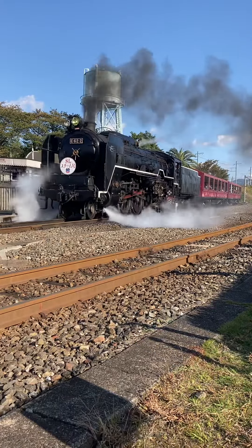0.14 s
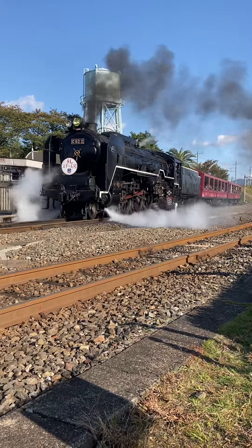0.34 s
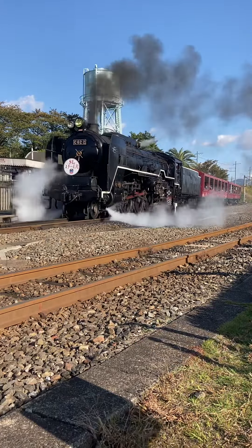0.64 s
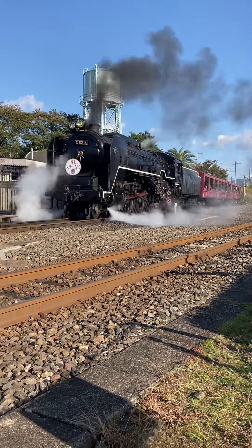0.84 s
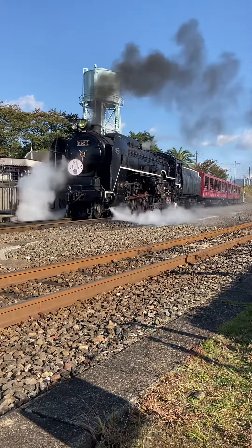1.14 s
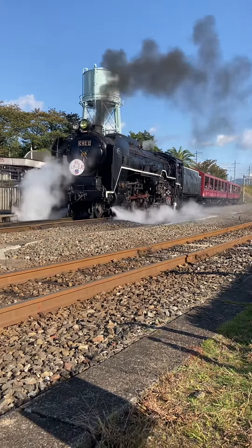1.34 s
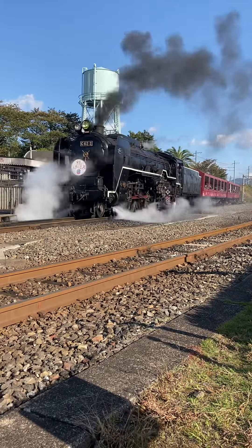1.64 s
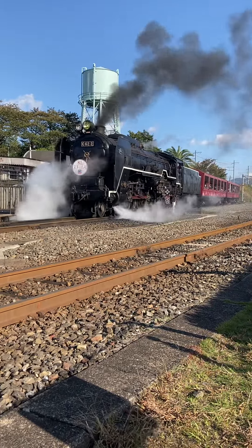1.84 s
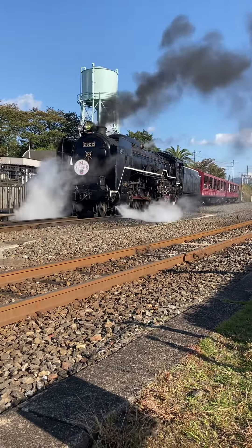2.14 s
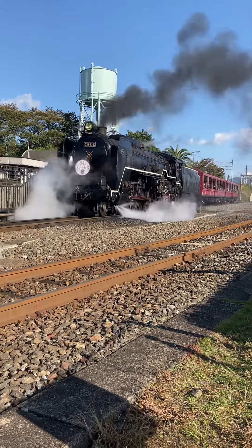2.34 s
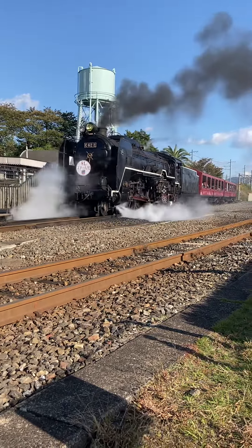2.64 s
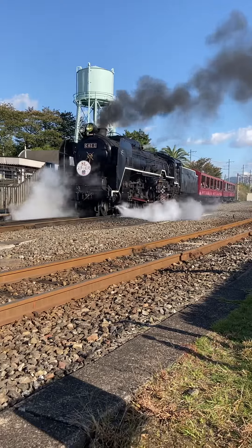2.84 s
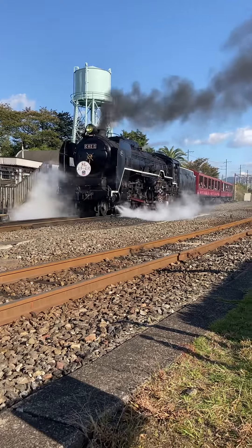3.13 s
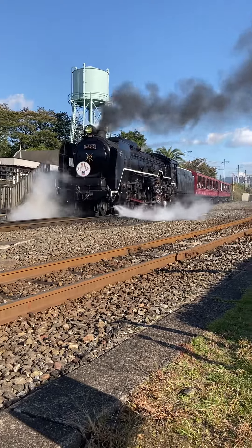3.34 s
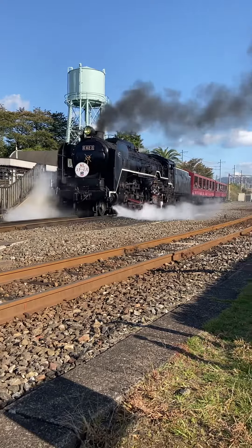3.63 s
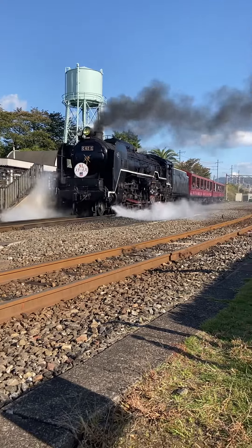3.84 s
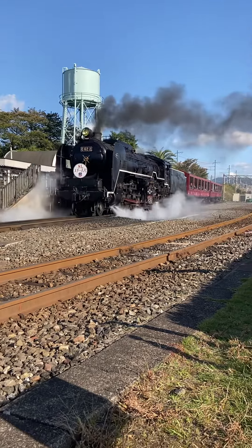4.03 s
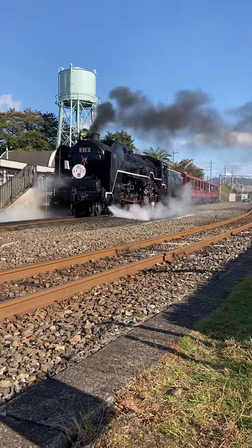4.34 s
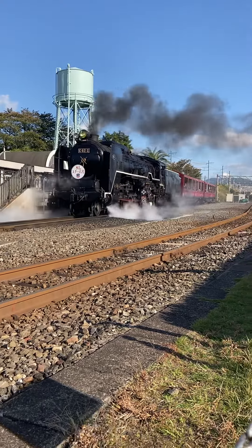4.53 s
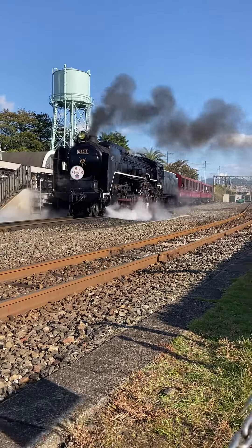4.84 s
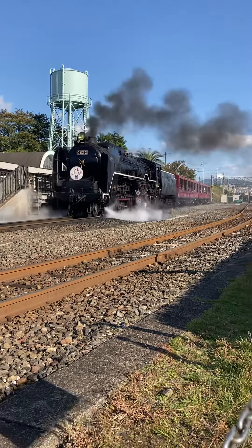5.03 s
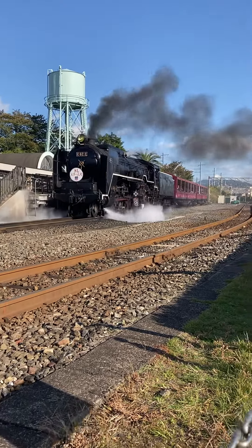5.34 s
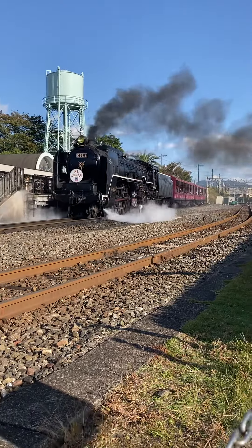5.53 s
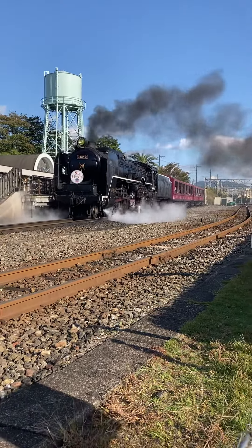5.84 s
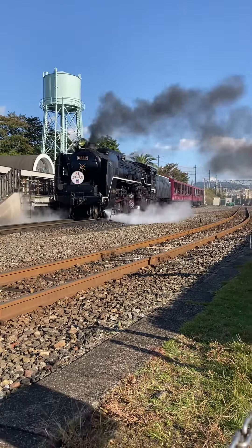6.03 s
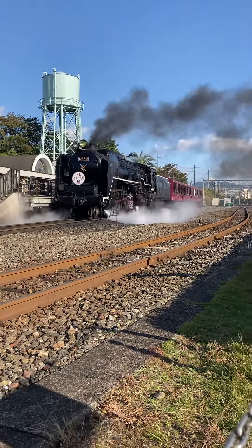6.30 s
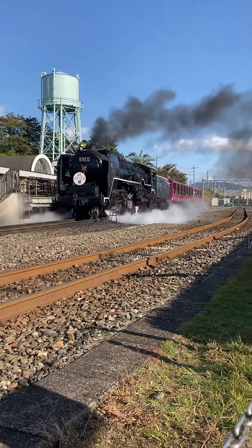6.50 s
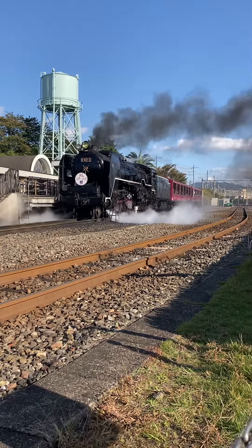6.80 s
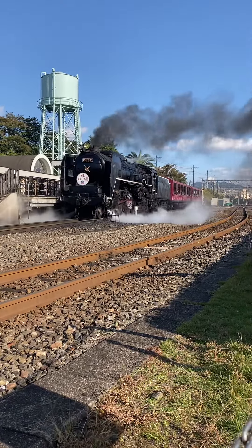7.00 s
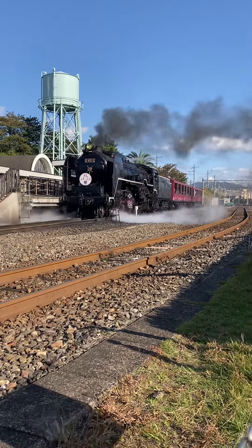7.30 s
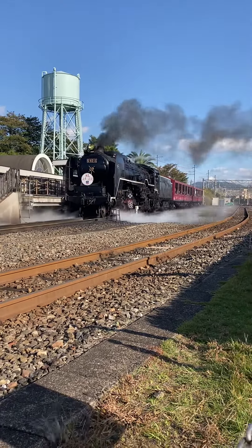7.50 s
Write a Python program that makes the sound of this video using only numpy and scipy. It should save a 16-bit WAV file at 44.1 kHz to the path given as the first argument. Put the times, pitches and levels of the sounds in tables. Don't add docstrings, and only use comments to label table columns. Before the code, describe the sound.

Surging jets of bright steam hiss over a soft furnace draught, with faint metallic squeaks and increasingly strong gusts buffeting the phone.

```python
import sys
import numpy as np
from scipy import signal
from scipy.fft import rfft, irfft, next_fast_len
from scipy.io import wavfile
from scipy.ndimage import uniform_filter1d, map_coordinates

SR = 44100
rng = np.random.default_rng(int(sys.argv[2]) if len(sys.argv) > 2 else 0)


def rack_gain(trim_db):
    fader = np.asarray(trim_db, float)
    return 10 ** (fader / 20)


def bounce(signal):
    frames = np.transpose(np.atleast_2d(signal))
    limited = np.clip(frames, -1, 1)
    pcm = np.round(limited * 32767).astype(np.int16)
    wavfile.write(sys.argv[1], SR, pcm)


N = 337786
HOP = 256
TOP_HZ = 15800


def unit(x):
    return x / np.sqrt(np.mean(x ** 2) + 1e-20)


def along(points, hz, axis=1):
    table = np.transpose(points)
    return np.interp(np.log(hz + 1), np.log(table[0] + 1), table[axis])


def curves(rows, t):
    s, *cols = np.transpose(rows)
    return np.array([np.interp(t, s, c) for c in cols])


def smooth(curve_at):
    t = np.arange(0, N + HOP, HOP) / SR
    return curves(np.vstack([t, curve_at(t)]).T, np.arange(N) / SR)


def swells(rows, t, steep=2):
    s, length = np.transpose(rows)[:2, :, None]
    return np.exp(-np.abs(2 * (t - s) / length) ** steep)


def wobble(rate):
    return map_coordinates(rng.standard_normal(N // 20), [np.arange(N) * rate / SR])


def filtered(x, response):
    m = next_fast_len(N + 8192)
    hz = np.fft.rfftfreq(m, 1 / SR)
    return irfft(rfft(x, m) * response(hz), m)[..., :N]


def shaped(x, gain_db):
    size, overlap = 4 * HOP, 3 * HOP
    hz, t, z = signal.stft(x, SR, nperseg=size, noverlap=overlap)
    z = z * rack_gain(gain_db(hz[:, None], t, z))
    return signal.istft(z, SR, nperseg=size, noverlap=overlap)[1][..., :N]


def rush(spectrum, channels):
    white = rng.standard_normal((channels, N))
    return unit(filtered(white, lambda hz: rack_gain(along(spectrum, hz))))


# [f/Hz, left port share, right port share]
BALLAST_ECHO = [(300, .5, .3), (800, .55, .25), (1300, 1.25, .35), (1820, 1.6, .25), (2340, .12, .12),
                (2860, .42, .08), (3900, .35, .1), (4500, .15, .15), (8000, .04, .04)]
# [f/Hz, lag/rad]
PORT_LAG = [(300, 1), (650, 1.6), (1000, 1), (1550, 0), (2200, 0), (2420, .5), (3100, 1), (3600, 1.9),
            (4400, 2.8), (5500, 3.25), (6300, 2.4), (8450, 0), (11700, -3.14), (14900, -6.28)]
# [f/Hz, level/dB]
BODY_SHADE = [(600, 0), (900, -2), (1500, -.5), (2400, 0), (3100, -3), (3900, -2.5), (4300, 0)]
# [f/Hz, level/dB]
SCATTER = [(600, -7), (1500, -14.5), (2300, -15.5), (3500, -10), (5000, -8.5), (7000, -10), (9000, -12),
           (11700, -14), (15000, -12)]
# [t/s, length/s, rise level/dB]
STEAM_CLOUDS = [
    (.1, .5, 2.5),
    (.7, .5, 3.3),
    (1.2, .5, 1.2),
    (1.7, .3, 2.2),
    (2.6, .6, 3.3),
    (3.2, .2, 2),
    (4.62, .75, 5.2),
    (6.25, .5, 3.2),
    (6.95, .45, 3.5),
    (7.5, .7, 3),
]
CLEAR_DB = -2.4


def ports(noises):
    def direct_and_echo(hz):
        share = np.array([along(BALLAST_ECHO, hz, axis=1), along(BALLAST_ECHO, hz, axis=2)])
        delay = np.exp(-2j * np.pi * hz * .001923)
        echo = (1 + share * delay) / np.sqrt(1 + share ** 2)
        lag = np.exp(-1j * np.outer([1, 0], np.interp(hz, *np.transpose(PORT_LAG))))
        return lag * echo * rack_gain(np.outer([1, 0], along(BODY_SHADE, hz)))

    cloud_db = smooth(lambda t: np.transpose(STEAM_CLOUDS)[2] @ swells(STEAM_CLOUDS, t))
    scattered = filtered(noises[1:], lambda hz: rack_gain(along(SCATTER, hz)))
    return filtered(noises[0], direct_and_echo) + rack_gain(CLEAR_DB + cloud_db) * scattered


# [f/Hz, level/dB per Hz]
JET_COLOUR = [(600, -36), (1150, -18), (1550, -7.5), (2000, -6), (2400, -2.5), (3200, -1), (5000, 1.7),
              (6200, -.5), (7500, -2.8), (8400, .6), (10000, 2), (12000, 2), (13800, -2), (15700, -2)]
# [t/s, flow level/dB, brightness/dB per octave]
COCK_FLOW = [(0.0, -25, -2.8), (0.27, -29.5, -3.4), (0.85, -29.5, -1.6), (0.9, -33, -1.5),
             (1.14, -35, -0.5), (1.77, -33, -1.8), (1.85, -22.5, 0), (2.17, -24.5, -1.5), (2.25, -32, -2.8),
             (3.18, -26, -2.35), (3.73, -29, -4.5), (3.98, -33.5, -3.2), (5.12, -33, -4), (5.57, -23.5, 1),
             (5.95, -27.5, -2.7), (6.65, -31, -3.5), (6.73, -29, 0.5), (7.66, -37, 0.1)]
# [t/s, length/s, centre f/Hz, rise level/dB]
WET_SPURTS = [(0.184, 0.13, 11100, 11.5), (0.566, 0.66, 2040, 0.5), (1.078, 0.39, 11300.0, 4),
              (1.467, 0.26, 9900, 2.5), (1.61, 0.23, 5300.0, 2.5), (2.05, 0.29, 15800, 9.5),
              (2.165, 1.3, 4800, 6.5), (2.236, 0.17, 10950, 18), (2.416, 0.24, 9600.0, 16),
              (2.5, 0.47, 16900, 13.5), (2.703, 0.41, 8700, 10.5), (3.017, 0.15, 11900, 13.5),
              (3.457, 0.54, 11700, 9), (3.572, 0.29, 6400, 7), (4.108, 1.02, 13000, 10.5),
              (4.165, 2.2, 4400, 6.5), (4.41, 1.02, 6800, 10), (5.17, 0.25, 11200, 8),
              (5.45, 0.36, 15800, 5), (5.656, 0.12, 4960, 5.4), (5.674, 0.13, 9600.0, 11),
              (5.812, 0.1, 7240, 8), (5.9, 0.5, 5300, 7), (6.233, 0.78, 3320, 7),
              (6.376, 0.37, 15500.0, 11), (6.365, 0.63, 6300, 7.5), (6.682, 0.14, 8500, 4),
              (7.386, 0.32, 7600, 3)]
# [f/Hz, level/dB]
HISS_TINT = [(1500, -1.5), (1800, 2), (2050, -2), (2370, 3.5), (2680, -0.5), (3100, 1.4), (3900, -1.74),
             (6000, 0.1)]
SPURT_OCTAVES, PIVOT_HZ = 0.42, 4730


def steam():
    def surge_db(hz, t, _):
        flow_db, tilt_db = curves(COCK_FLOW, t)
        centre_hz, rise_db = np.transpose(WET_SPURTS)[2:]
        edge_hz = np.clip(hz, 1400, TOP_HZ)
        brightness_db = tilt_db * np.log2(edge_hz / PIVOT_HZ)
        reach = np.exp(-(np.log2(edge_hz / centre_hz) / SPURT_OCTAVES) ** 2)
        spurt_db = (rise_db * reach) @ swells(WET_SPURTS, t, steep=2.1)
        eddies = uniform_filter1d(rng.standard_normal((len(hz), len(t))), size=24, axis=0)
        eddies = uniform_filter1d(eddies, size=9, axis=1)
        eddy_db = 1.51 * unit(eddies) * np.clip(hz / 7000, .55, 1.7)
        return flow_db + brightness_db + spurt_db + along(HISS_TINT, hz) + eddy_db

    jets = shaped(rush(JET_COLOUR, channels=3), surge_db)
    bright = filtered(jets, lambda hz: 1 / (1 + (6000 / (hz + 1)) ** 4))
    flutter = rack_gain(0.96 * wobble(12) + 0.63 * wobble(260))
    return ports(jets + bright * (flutter - 1))


# [f/Hz, level/dB per Hz]
DRAUGHT_COLOUR = [(150, -45), (300, 2), (400, -1.5), (700, 2.5), (1000, 5), (1300, 8.5), (2000, 9.5),
                  (4000, -79)]
# [t/s, length/s, rise level/dB]
EXHAUST_BEATS = [
    (0.0, 0.81, 8),
    (1.995, 0.64, 5),
    (3.465, 0.92, 8),
    (4.59, 0.27, -0.5),
    (5.404, 0.53, 6.5),
    (6.284, 0.73, 8.5),
    (7.354, 0.74, 4),
]
DRAUGHT_DB = -53.5


def boiler():
    rise_db = smooth(lambda t: np.transpose(EXHAUST_BEATS)[2] @ swells(EXHAUST_BEATS, t))[0]
    level_db = DRAUGHT_DB + rise_db + 0.5 * wobble(4.7)
    return ports(rack_gain(level_db) * rush(DRAUGHT_COLOUR, channels=3))


# [t/s, length/s, thump level/dB, flap level/dB]
PORT_GUSTS = [(0.097, 0.12, -53.0, -60), (0.839, 0.054, -45.5, -51.5), (0.99, 0.25, -48, -53),
              (1.316, 0.18, -52, -47.5), (1.462, 0.04, -45.5, -66), (1.626, 0.04, -55, -69.5),
              (1.82, 0.91, -56, -63), (2.186, 0.04, -45, -53.0), (2.328, 0.25, -54, -52),
              (2.522, 0.044, -51.0, -57.5), (2.57, 0.064, -51.0, -54.5), (4.01, 0.1, -64, -60),
              (4.2, 0.64, -57, -80), (4.627, 0.05, -53, -61.5), (4.854, 0.088, -42, -47),
              (5.029, 0.036, -38, -58), (5.1, 0.12, -39, -69), (5.235, 1.0, -48, -61),
              (5.236, 0.076, -38, -56), (5.353, 0.031, -39, -54), (5.617, 0.033, -37.5, -57.0),
              (5.702, 0.087, -47, -56), (6.753, 0.098, -41, -38), (6.906, 0.052, -58.0, -41),
              (6.971, 0.026, -31, -56.0), (7.0, 1, -45.0, -58.5), (7.068, 0.04, -48.0, -41),
              (7.201, 0.12, -36.5, -43), (7.62, 0.04, -42, -61), (7.7, 0.22, -49, -44)]
CALM_LEVELS = [
    [-64],
    [-72.5],
]
# [f/Hz, level/dB per Hz]
THUMP_COLOUR = [(13, -61), (22, -24), (46, 0.5), (65, 4), (99, 0), (260, -25), (340, -74), (570, -120)]
# [f/Hz, level/dB per Hz]
FLAP_COLOUR = [(80, -14), (160, 3.5), (300, -6), (450, -10.5), (700, -21), (1200, -28)]


def wind():
    def gust_levels(t):
        peaks = rack_gain(np.transpose(PORT_GUSTS)[2:])
        power = peaks ** 2 @ swells(PORT_GUSTS, t, steep=3.6) ** 2
        return np.sqrt(rack_gain(CALM_LEVELS) ** 2 + power)

    thump_level, flap_level = smooth(gust_levels)
    lumps_db = 2.4 * wobble(30)
    thump = thump_level * rack_gain(0.1 + 0.94 * lumps_db) * rush(THUMP_COLOUR, channels=2)
    flap = flap_level * rack_gain(-1.35 + lumps_db + 3.1 * wobble(70)) * rush(FLAP_COLOUR, channels=2)
    common, unlike = thump + flap
    return common + rack_gain(-3.0) * np.outer([1, -1], unlike)


# [t/s, length/s, start f/Hz, end f/Hz, level/dB]
GEAR_SQUEAKS = [
    (3.29, 0.42, 594, 587, -67),
    (4.476, 0.12, 900, 1030, -64),
    (4.85, 0.11, 1155, 1150, -61),
    (5.243, 0.041, 1150, 1070, -61),
]


def squeaks():
    t, out = np.arange(N) / SR, np.zeros(N)
    for s, length, start_hz, end_hz, db in GEAR_SQUEAKS:
        u = np.clip((t - s) / length, 0, 1)
        pitch_hz = (start_hz + (end_hz - start_hz) * u) * (1 + .008 * wobble(40))
        level = rack_gain(db + 9.5 + 3.7 * wobble(30)) * np.sin(np.pi * u)
        out += level * np.sin(2 * np.pi * np.cumsum(pitch_hz) / SR)
    return ports(np.outer([1, 0, 0], out))


def scene():
    return steam() + boiler() + wind() + squeaks()


# [t/s, mono below f/Hz, hollow f/Hz, hollow level/dB]
WIND_GUARD = [(0, 40, 190, -5), (.75, 40, 300, -11), (1.1, 40, 440, -14), (1.75, 40, 580, -15),
              (2.2, 400, 660, -14), (2.45, 480, 700, -3), (2.9, 580, 770, -2), (3.5, 380, 790, -1),
              (4.2, 450, 720, -2), (4.65, 200, 420, -10), (4.98, 40, 440, -14), (5.12, 160, 680, -24),
              (5.5, 560, 750, -11), (6.3, 400, 780, -5), (6.75, 480, 820, -2), (7.27, 780, 1250, -15),
              (7.66, 920, 1310, -2)]
FLICKER, RAGGED_DB = .55, 1.2


def wind_guard(pair):
    def guard_db(hz, t, _):
        mono_hz, hollow_hz, hollow_db = curves(WIND_GUARD, t)
        at = np.minimum(np.arange(len(t)) * HOP, N - 1)
        mono_hz = mono_hz * rack_gain(RAGGED_DB * wobble(16)[at])
        hollow_db = hollow_db * np.clip(1 + FLICKER * wobble(25)[at], 0, None)
        middle_db = hollow_db * np.exp(-(np.log((hz + 1) / hollow_hz) / 0.22) ** 2)
        side_db = np.clip(150 * np.log10((hz + 1) / mono_hz), -80, 0)
        return np.array([middle_db, side_db]) - 120 * (hz > TOP_HZ)

    return shaped(pair, guard_db)


# [f/Hz, level/dB]
STARVE_BELOW = [(400, -11), (1000, -14), (1600, -18), (2300, -16), (4500, -12), (6000, -9), (8000, -5.5),
                (9500, -5), (12000, -7.5), (14500, -4.5)]


def starve_weaker(pair):
    def starve_db(hz, t, z):
        bands = np.round(14 * np.sqrt(hz[:, 0] / 1000 + 1) ** 1.3).astype(int)
        frames = np.arange(len(t)) // 4
        cells = bands[:, None] * (frames[-1] + 1) + frames
        powers = [np.bincount(cells.ravel(), np.abs(v.ravel()) ** 2)[cells] for v in z]
        power_db = 10 * np.log10(np.array(powers) + 1e-20)
        luck = rng.standard_normal((bands.max() + 1, frames[-1] + 1))
        drift_db = 2.3 * unit(uniform_filter1d(luck, size=3, axis=1)).ravel()[cells]
        return -80 * (power_db - power_db[::-1] < along(STARVE_BELOW, hz) + drift_db)

    return shaped(pair, starve_db)


def low_pass(x):
    return signal.sosfilt(signal.butter(12, 16030, fs=SR, output="sos"), x)


def record(dry):
    pair = np.array([dry[0] + dry[1], dry[0] - dry[1]]) / 2
    mid, side = starve_weaker(wind_guard(pair))
    return low_pass(np.array([mid + side, mid - side]))


dry = scene()
out = record(dry)
bounce(out)
```